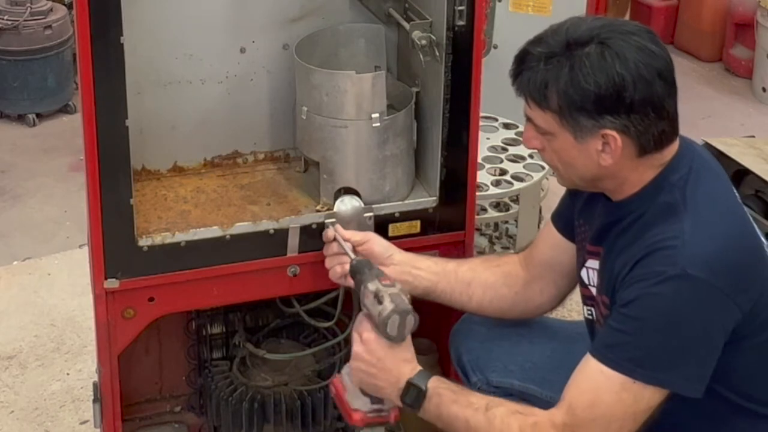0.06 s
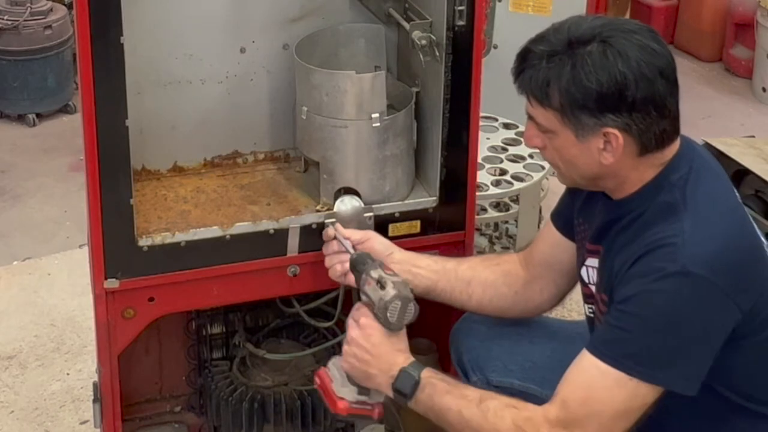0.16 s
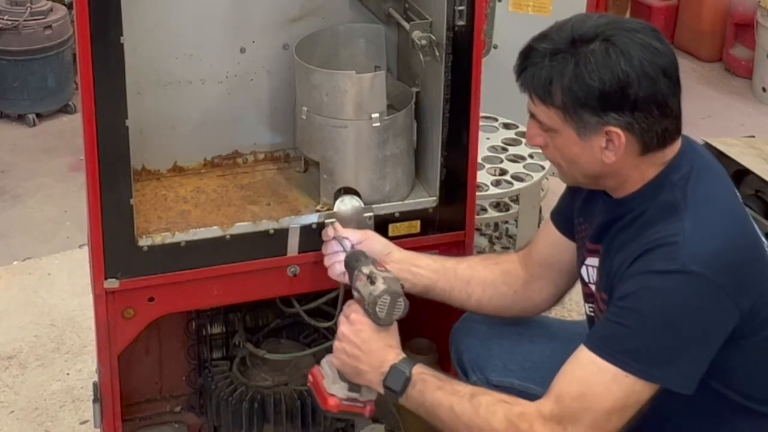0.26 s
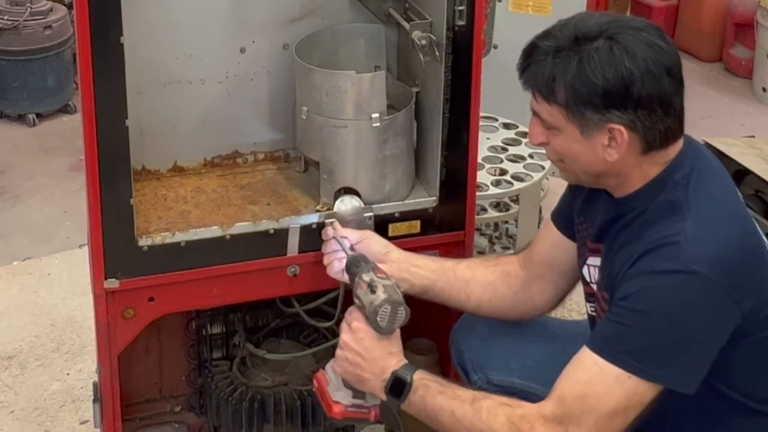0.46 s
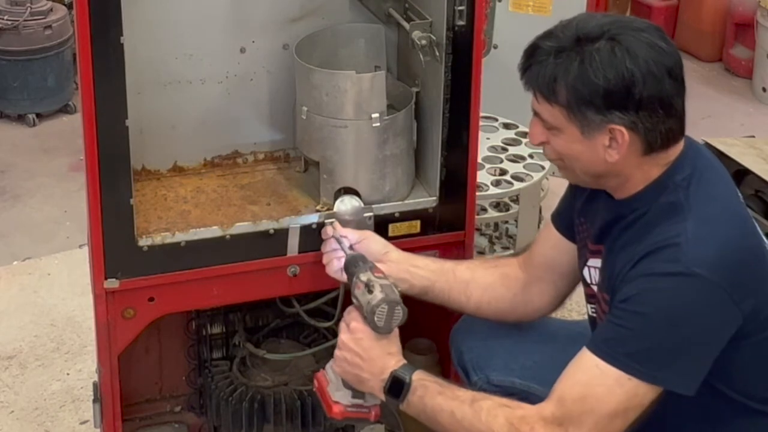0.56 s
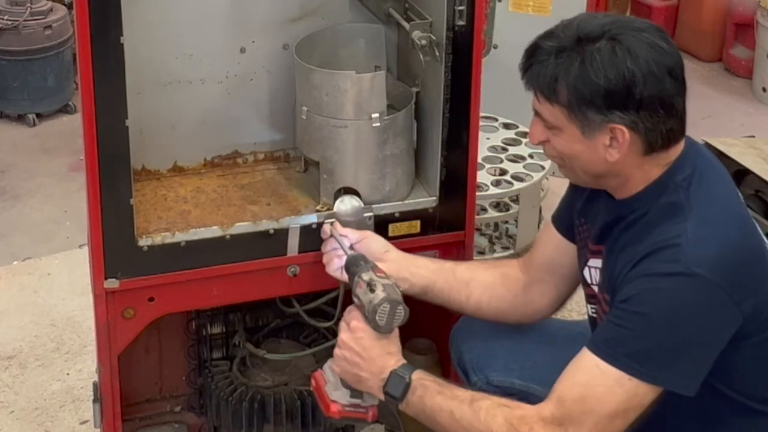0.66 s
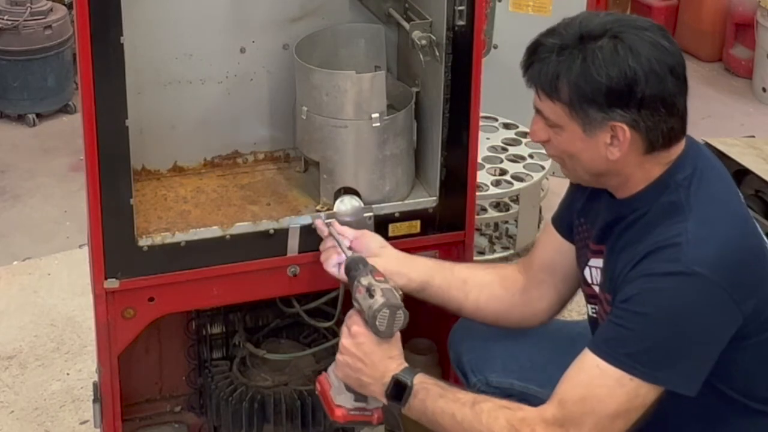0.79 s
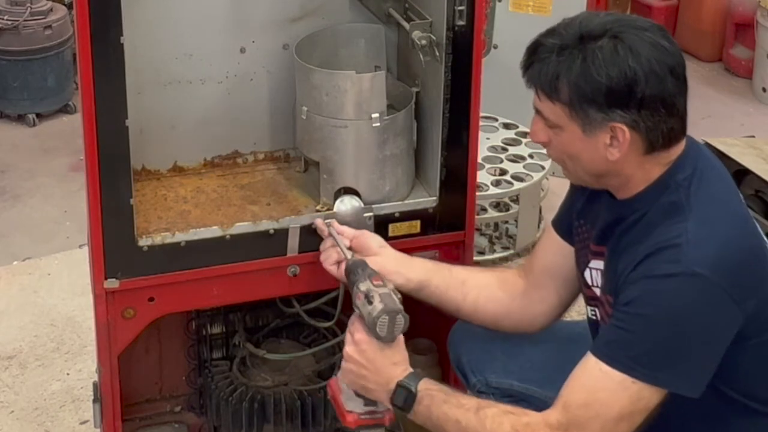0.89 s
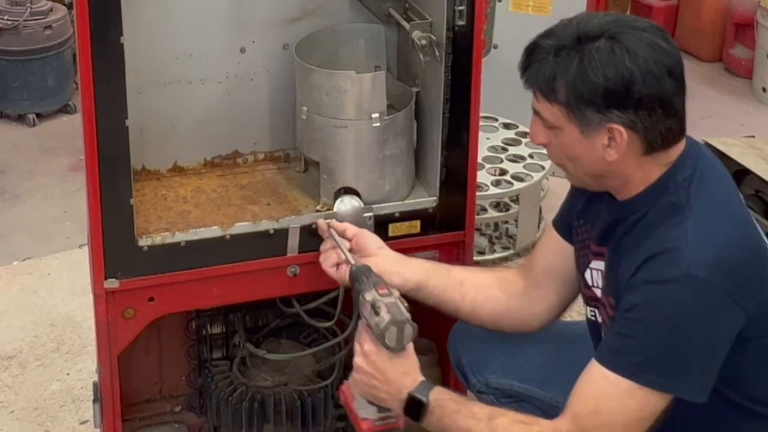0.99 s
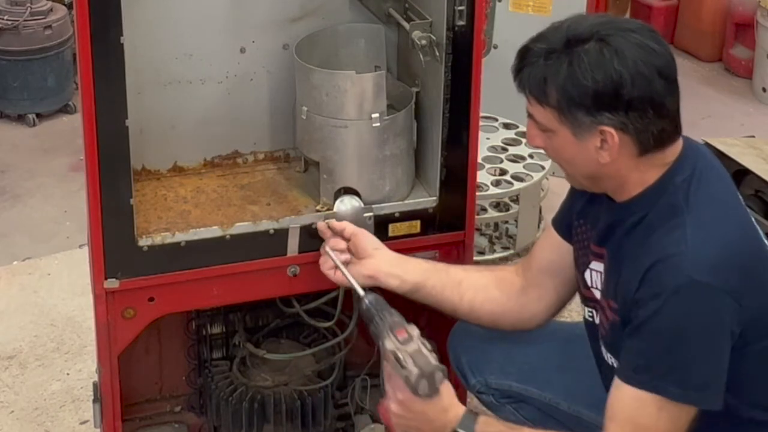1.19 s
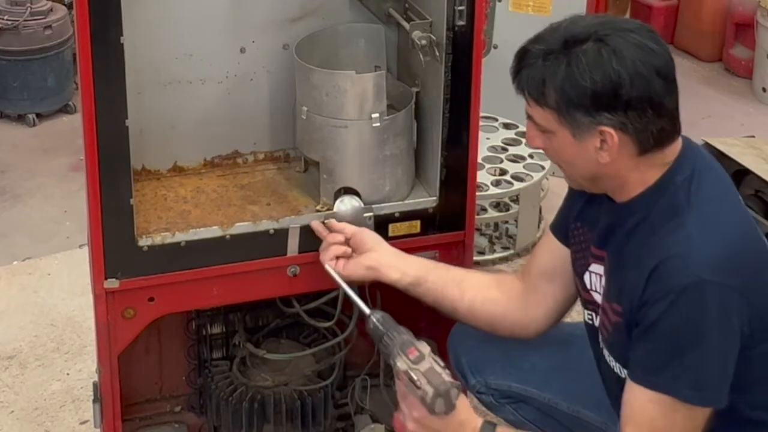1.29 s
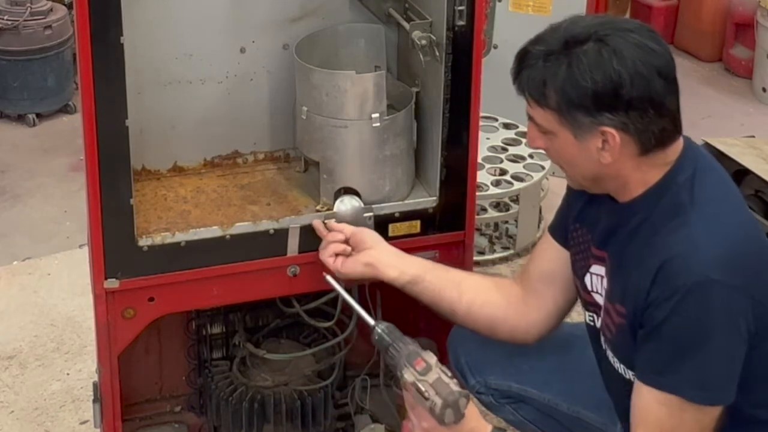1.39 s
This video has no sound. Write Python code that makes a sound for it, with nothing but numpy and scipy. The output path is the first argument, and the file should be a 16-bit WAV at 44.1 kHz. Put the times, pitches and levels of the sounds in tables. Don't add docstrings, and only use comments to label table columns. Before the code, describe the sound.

A cordless drill whirs in one half-second burst, a screw squealing loose and the bit thumping a hollow metal cabinet; then quiet, small handling clicks and a faint motor restart, close in an echoing workshop.

```python
import sys
import numpy as np
from scipy import signal
from scipy.fft import rfft, irfft, next_fast_len
from scipy.io import wavfile
from scipy.ndimage import map_coordinates

SR = 44100
rng = np.random.default_rng(int(sys.argv[2]) if len(sys.argv) > 2 else 0)


def rack_gain(trim_db):
    fader = np.asarray(trim_db, float)
    return 10 ** (fader / 20)


def wav_record(signal):
    frames = np.transpose(np.atleast_2d(signal))
    bounded = np.clip(frames, -1, 1)
    quanta = np.round(bounded * 32767).astype(np.int16)
    wavfile.write(sys.argv[1], SR, quanta)


N = 63945
T = np.arange(N) / SR


def unit(x):
    return x / np.sqrt(np.mean(x ** 2) + 1e-20)


def along(points, hz):
    f, v = np.transpose(points)
    return np.interp(np.log(hz + 1), np.log(f + 1), v)


def wobble(rate):
    points = rng.standard_normal(int(N * rate / SR) + 4)
    return map_coordinates(points, [T * rate])


def noise():
    return rng.standard_normal(N)


def filtered(x, response):
    m = next_fast_len(N + SR // 2)
    f = np.fft.rfftfreq(m, 1 / SR)
    return irfft(rfft(x, m) * response(f), m)[..., :N]


def level(rows):
    s, db = np.transpose(rows)
    return rack_gain(np.interp(T, s, db, left=-150, right=-150))


def strike(s, attack_s, t60):
    t = np.clip(T - s, 0, None)
    return (1 - np.exp(-t / attack_s)) * rack_gain(-60 * t / t60)


def peaks(rows, f):
    return rack_gain(sum(db / (1 + (2 * (f - c) / w) ** 2) for c, w, db in rows))


def octave_bell(hz, centre_hz, octaves):
    return np.exp(-(np.log2(hz / centre_hz) / octaves) ** 2)


# (time [s], tooth rate [Hz], level [dB])
GEAR_MESH = [
    (0.254, 2010, -53),
    (.31, 2048, -40),
    (0.358, 2107, -29.5),
    (0.453, 2141, -31),
    (0.597, 2207, -29.5),
    (0.668, 2139, -32.5),
    (0.702, 2000, -33),
    (0.736, 1760, -52),
    (.76, 1710, -91),
]
# (multiple, level [dB])
TOOTH_HARMONICS = [(2, -6), (3, -4), (4, 2), (6, -19), (7, -30.5)]


def whine():
    s, hz, db = np.transpose(GEAR_MESH)
    tooth_hz = np.interp(T, s, hz) * (1 + 0.0013 * wobble(60.94))
    phase = 2 * np.pi * np.cumsum(tooth_hz) / SR
    tones = 0
    for multiple, tone_db in TOOTH_HARMONICS:
        fading_db = 1.5 * (wobble(39.4) + wobble(250))
        blur = 0.35 * wobble(400)
        tones = tones + rack_gain(tone_db + fading_db) * np.sin(multiple * phase + blur)
    return level(np.c_[s, db]) * tones


# (time [s], level [dB])
MOTOR_EFFORT = [
    (.19, -34),
    (.196, -53.5),
    (.24, -33.5),
    (.246, -31),
    (.31, -36.5),
    (.6, -36.5),
    (.82, -38.5),
    (.85, -48),
    (.87, -90.5),
]
# (time [s], level [dB])
MOTOR_RESTART = [
    (1.37, -75),
    (1.41, -64),
    (1.43, -54),
    (1.45, -56),
]
# (frequency [Hz], level [dB per Hz])
GEAR_TONE = [(150, -21), (300, -0.5), (2230, -13.5), (6390, -10.5), (9000, -6.5), (10500, -7), (12500, -17),
             (16300, -17)]
# (centre [Hz], width [Hz], level [dB])
HOUSING_PEAKS = [(834, 73, 7), (537, 120, -10.5), (1837, 390, 6.5), (4250, 6300, 8), (3880, 64, 4.5),
                 (5050, 110, 4.5), (5390, 54, 4.5), (6250, 810, 2), (8740, 2000, 0), (9200, 570, 1.5)]


def gears():
    grit_db = 2.5 * wobble(980) + 1.5 * wobble(69.2)
    hiss = filtered(noise() * rack_gain(grit_db), lambda f: rack_gain(along(GEAR_TONE, f)) * peaks(HOUSING_PEAKS, f))
    dull = filtered(hiss, lambda f: 1 / (1 + (f / 12960) ** 4))
    return unit(hiss) * level(MOTOR_EFFORT) + unit(dull) * level(MOTOR_RESTART)


# (start [s], pitch [Hz], level [dB],
# 60 dB decay [s])
SQUEALS = [(.242, 4330, -21, .06), (.248, 4050, -13, .04), (.256, 4200, -23, .035), (.264, 3950, -32, .06),
           (.262, 4150, -35, .15), (.257, 4600, -24, .1), (.267, 4613, -20, .06), (.286, 4613, -23, .08),
           (.345, 4720, -29, .06), (.365, 4740, -32, .06), (.252, 8032, -29, .12), (.272, 8060, -26, .07),
           (.258, 8850, -27, .08), (.273, 9250, -24, .05), (.25, 8600, -28, .12), (.254, 9300, -23, .08),
           (.264, 9150, -20, .09), (.272, 8400, -28, .08), (.284, 9200, -23, .06), (.308, 9050, -29, .06),
           (.345, 9150, -33, .1), (.32, 4100, -32, .08), (.3, 9028, -31, .1), (.244, 12800, -38, .1),
           (1.425, 4355, -66, .5), (1.425, 5827, -68, .5), (1.425, 832, -67, .5)]


def squeal():
    out = 0
    for s, hz, db, t60 in SQUEALS:
        flutter = rack_gain(db + 5.5 + 2.6 * wobble(150.2))
        tone = np.sin(2 * np.pi * hz * T + 0.55 * wobble(200))
        out = out + flutter * strike(s, 0.003, t60) * tone
    return out


# (time [s], level [dB], 60 dB decay [s], pitch most excited [Hz])
BIT_THUMPS = [(0.119, -62, 0.33, 145), (0.196, -39, 0.12, 198), (0.2433, -19.5, 0.11, 169),
              (0.242, -32, 0.52, 70.6), (.25, -29, 0.069, 400), (0.31, -28.5, 0.1, 240),
              (.325, -29, 0.16, 206), (.343, -41.5, 0.13, 321), (0.317, -30, 0.38, 65.5),
              (.385, -33.5, 0.18, 114.4), (0.421, -46, 0.81, 214), (0.469, -41.5, 0.29, 213),
              (.5, -43.5, 0.45, 202), (0.534, -39.5, 0.17, 264), (0.554, -32, 0.14, 180),
              (.56, -44.5, 0.09, 400), (0.619, -33, 0.16, 266), (0.601, -42.5, 0.9, 70),
              (0.696, -33.5, 0.18, 161.5), (0.723, -39, 0.16, 148), (0.731, -45, 0.21, 73),
              (0.769, -37.5, 0.28, 147), (.805, -29.5, 0.083, 226), (0.826, -40, 0.14, 78),
              (0.916, -54.5, 0.4, 145), (.92, -55, 0.24, 77.1), (1.001, -63.5, 0.61, 180),
              (0.98, -53, 0.37, 73.2), (1.05, -70, 1, 182)]
# (frequency [Hz], level [dB])
PANEL_MODES = [(61, 7.5), (75, 4), (108, 5), (141, 3.5), (176, 4.5), (215, 1), (258, -6.5), (325, 1.5),
               (372, 4.5), (420, 5.5), (470, 10)]


def cabinet():
    attack_s, rattle_db, rattle_hz, rattle_s = 0.0016, -7, 1400, 0.16

    def rattle_band(f):
        low_cut = (f / 600) ** 2 / (1 + (f / 600) ** 2)
        return low_cut / (1 + (f / rattle_hz) ** 2)

    rattle = unit(filtered(noise(), rattle_band))
    hz, db = np.transpose(PANEL_MODES)[..., None]
    out = 0
    for s, thump_db, t60, pitch_hz in BIT_THUMPS:
        turn = 0.54 * rng.random((len(PANEL_MODES), 1))
        modes = rack_gain(db) * octave_bell(hz, pitch_hz, 0.61) * np.sin(2 * np.pi * (hz * (T - s) + turn))
        ringing = strike(s, attack_s, t60) * modes.sum(0)
        rattling = rack_gain(rattle_db) * min(pitch_hz / 200, 1) * strike(s, attack_s, rattle_s) * rattle
        out = out + rack_gain(thump_db) * (ringing + rattling)
    return out


# (time [s], level [dB], centre [Hz], 60 dB decay [s])
HANDLING = [(0.118, -63.5, 890, 0.58), (0.118, -62, 2350, 1), (0.142, -56, 6380, 1),
            (.146, -54, 13200, .03), (0.196, -39, 860, 0.18), (0.246, -31.5, 10970, 0.11),
            (.254, -36, 8750, .15), (0.307, -28, 1870, 0.072), (0.323, -32, 795, 0.23),
            (0.326, -33, 1860, 0.074), (.548, -46, 820, 0.083), (0.614, -37.5, 807, 0.22),
            (0.703, -37, 700, 0.081), (0.801, -39.5, 1010, 0.19), (0.82, -34, 742, 0.1),
            (1.074, -68, 6940, 0.021), (1.079, -53, 6380, 0.021), (1.129, -43, 6600, 0.017),
            (1.1344, -36, 5440, 0.012), (1.138, -50, 6450, 0.03), (1.15, -65, 6900, 1),
            (1.135, -70, 1036, 0.54), (1.14, -70.5, 3440, 0.99), (1.212, -60, 2950, 0.17),
            (1.288, -58, 3430, 0.34), (1.287, -69, 13500, 0.18), (1.211, -56, 1690, 0.32),
            (1.214, -57, 400, 0.3), (1.231, -50.5, 930, 0.064), (1.286, -47.5, 1740, 0.2),
            (1.289, -52, 5860, 0.21), (1.288, -48, 461, 0.14), (1.3, -53, 1140, 0.24)]
# (centre [Hz], width [Hz], level [dB])
PLATE_PEAKS = [(400, 85, 6), (816, 180, 7), (1740, 170, 9.5), (2700, 170, 0), (3380, 150, 3),
               (4800, 300, 2.5), (6000, 170, -1.5), (13500, 14000, -1.5)]


def clicks():
    out = 0
    for s, db, hz, t60 in HANDLING:
        burst = filtered(noise(), lambda f: peaks(PLATE_PEAKS, f) * octave_bell(f + 1, hz, 0.7))
        out = out + rack_gain(db) * strike(s, 0.00037, t60) * unit(burst)
    return out


def cabinet_reflections(x):
    delays = 0.025 * rng.random((9, 2, 1))

    def bounces(f):
        echoes = sum((-1) ** k * np.exp(-2j * np.pi * f * d) for k, d in enumerate(delays))
        return rack_gain(-8) * f ** 2 / (f ** 2 + 493 ** 2) * echoes

    return filtered(x, bounces)


SIDES = np.array([[0.5], [-0.5]])

# (frequency [Hz], phase [radians])
PHASE_LEAD = [(150, -.1), (300, 0.56), (4000, 1.33), (9000, 1.9), (12000, 1.5), (13000, -0.26)]


def two_microphones(x):
    return filtered(x, lambda f: np.exp(1j * SIDES * along(PHASE_LEAD, f)))


# (frequency [Hz], left minus right [dB])
SIDE_LEAN = [(40, 5.5), (125, 0), (700, 0.5), (2500, 2.5), (9000, 5.5), (13000, -12.5)]


def leaning(pair):
    return filtered(pair, lambda f: rack_gain(SIDES * along(SIDE_LEAN, f)))


# (frequency [Hz], likeness [0 to 1])
LIKENESS = [(50, .9), (110, 0.72), (200, 1), (350, 0.64), (550, 0), (12000, 0.27)]


def spread(pair):
    def shares(f):
        turn = np.arccos(np.clip(along(LIKENESS, f), -1, 1)) / 2
        return np.array([np.cos(turn), np.sin(turn)])

    mid, side = filtered(pair, shares)
    return np.array([mid + side, mid - side])


# (frequency [Hz], 60 dB decay [s])
ROOM_DECAY = [(60, 0.99), (250, 0.37), (2000, 0.35), (9000, 0.28), (12500, 0.1)]
# (frequency [Hz], level [dB])
ROOM_LEVEL = [(100, -5), (250, 4.5), (500, 4), (4000, 2), (12000, -0.5)]


def workshop(x):
    hz, t, z = signal.stft(rng.standard_normal((2, SR)), SR, nperseg=256)
    t60 = along(ROOM_DECAY, hz)[:, None]
    decay = rack_gain(-60 * t / t60) * np.sqrt(0.3 / t60)
    tail = signal.istft(z * decay, SR, nperseg=256)[1]
    tail = tail / np.linalg.norm(tail[0])
    late = np.pad(x, (200, 0))[None]
    wet = signal.fftconvolve(late, tail, axes=1)[:, :N]
    return spread(filtered(wet, lambda f: rack_gain(along(ROOM_LEVEL, f))))


def air(spectrum):
    pair = rng.standard_normal((2, N))
    return unit(spread(filtered(pair, lambda f: rack_gain(along(spectrum, f)))))


# (frequency [Hz], level [dB per Hz])
FLOOR_TONE = [(24, -28.5), (40, 3), (135, -20.5), (415, -30.5), (1000, -42), (1740, -41), (2800, -43.5),
              (4730, -51.5), (6930, -39), (12000, -59.5), (15600, -60), (22000, -120)]
# (frequency [Hz], level [dB per Hz])
EARLIER_TONE = [(29, -43.5), (50, -1.5), (176, -7.5), (595, -53), (963, -23.5), (1750, -26), (4380, -40),
                (6460, -57.5), (12000, -72), (15600, -100), (22000, -120)]


def background():
    steady = rack_gain(-56 + 2.2 * wobble(10)) * air(FLOOR_TONE)
    dying = rack_gain(-52 - 60 * T / 0.3) * air(EARLIER_TONE)
    return steady + dying


def scene():
    hiss = gears()
    tones = whine() + squeal() + cabinet()
    small = clicks()
    direct = two_microphones(hiss + tones + small) + cabinet_reflections(hiss)
    wet = workshop(hiss + rack_gain(-8) * tones + rack_gain(-8) * small)
    return leaning(direct + wet) + background()


# (centre [Hz], width [Hz], level [dB])
NARROW_DIPS = [(5350, 110, -9), (7650, 230, -10), (3650, 90, -5)]


def microphone(pair):
    low_cut_hz = 46
    return filtered(pair, lambda f: (1j * f / (low_cut_hz + 1j * f)) ** 4 * peaks(NARROW_DIPS, f))


def gapped(x, rows):
    f, t, z = signal.stft(x, SR, nperseg=1024)

    def above(hz):
        edge_hz = hz + 230 * np.interp(t, T, wobble(24))
        return 0.5 + 0.5 * np.tanh((f[:, None] - edge_hz) / 60)

    cut_db = sum(db * above(lo) * (1 - above(hi)) for lo, hi, db in rows)
    return signal.istft(z * rack_gain(cut_db), SR, nperseg=1024)[1][:N]


# (low edge [Hz], high edge [Hz], level [dB])
SHARED_GAPS = [(10600, 11900, -24), (15500, 20000, -32)]
# (low edge [Hz], high edge [Hz], level [dB])
DIFFERENCE_GAPS = [(12400, 14600, -30), (15800, 20000, -25)]


def thin_treble(pair):
    left, right = pair
    mid = gapped(left + right, SHARED_GAPS) / 2
    side = gapped(left - right, DIFFERENCE_GAPS) / 2
    return np.array([mid + side, mid - side])


def top_cut(x):
    return signal.sosfilt(signal.butter(12, 16440, fs=SR, output="sos"), x)


def record(dry):
    mix = thin_treble(microphone(dry))
    return top_cut(mix)


dry = scene()
out = record(dry)
wav_record(out)
```